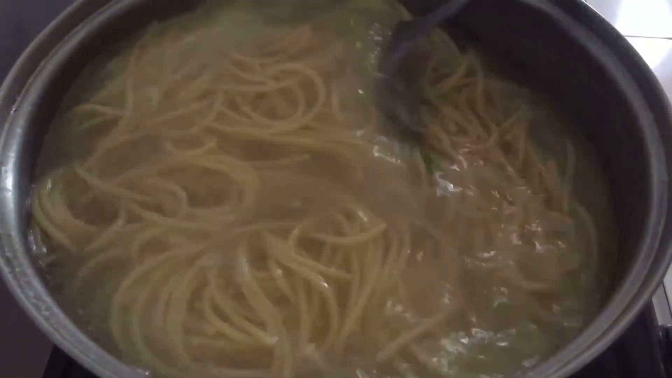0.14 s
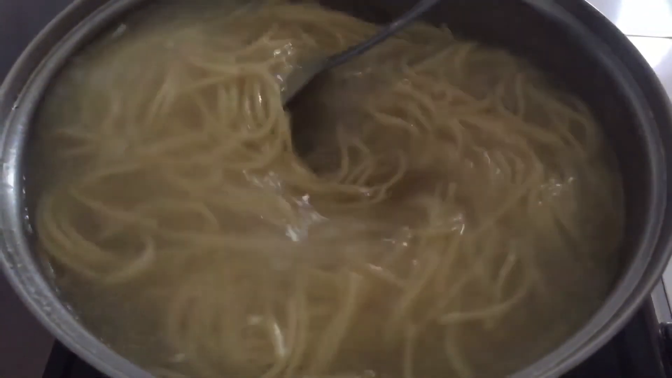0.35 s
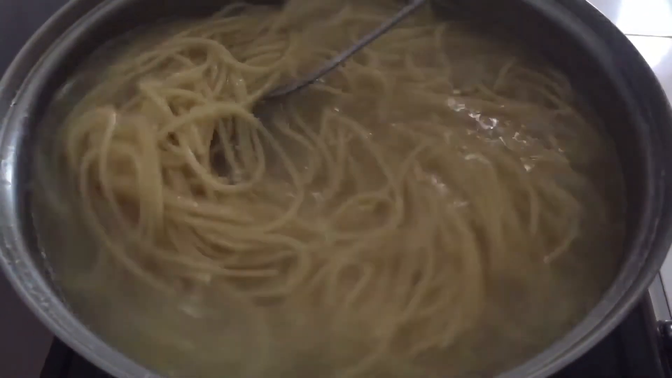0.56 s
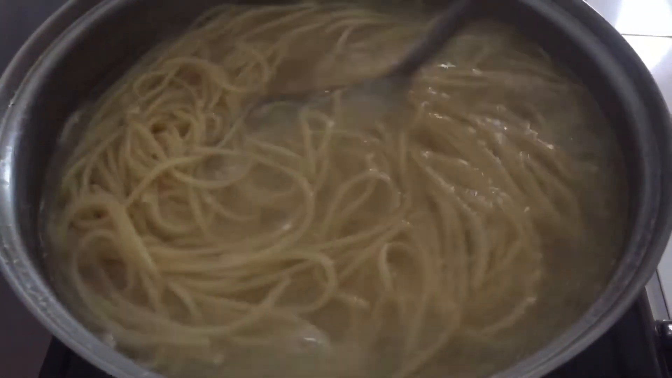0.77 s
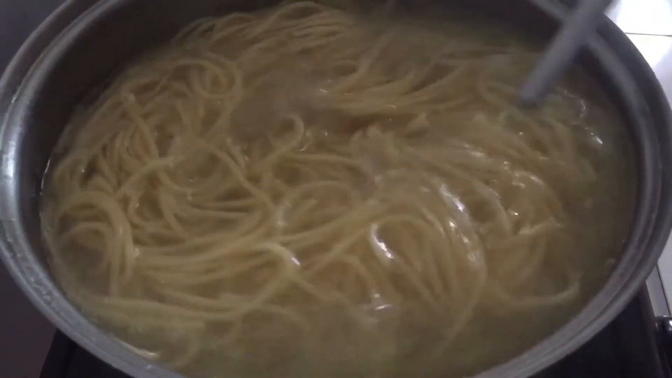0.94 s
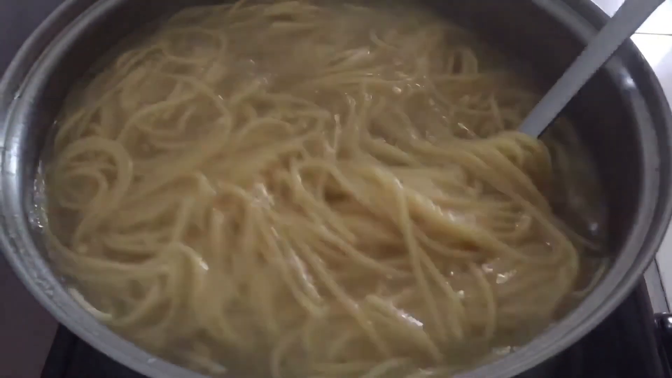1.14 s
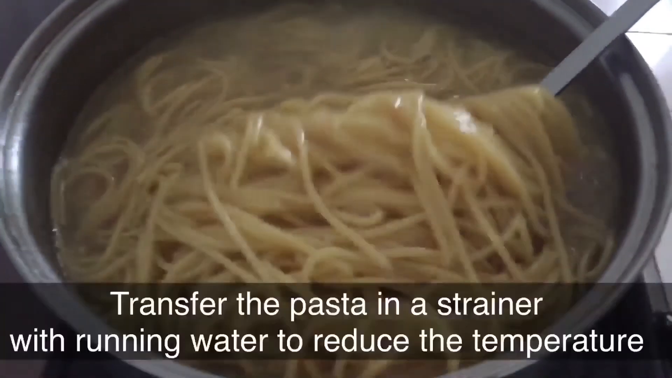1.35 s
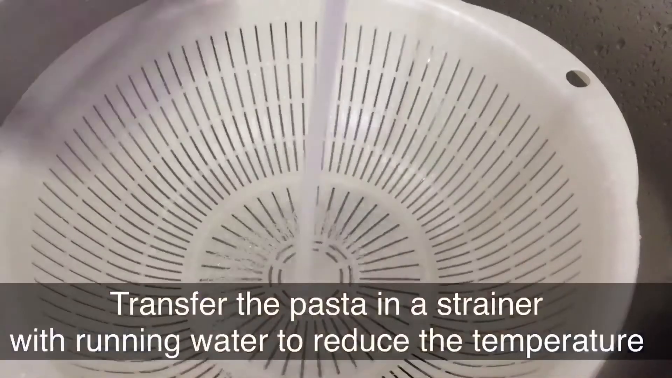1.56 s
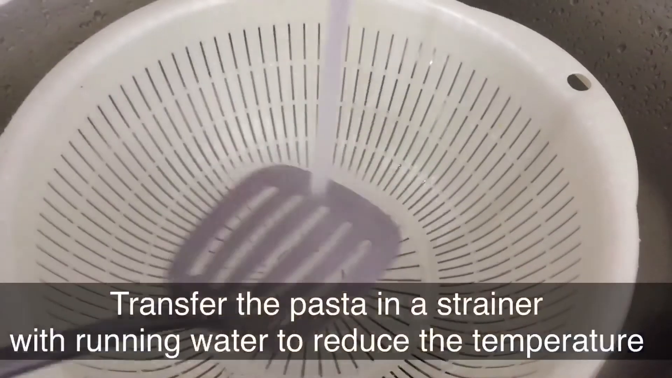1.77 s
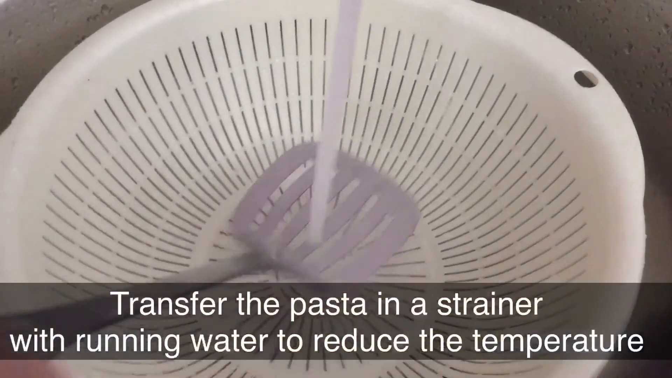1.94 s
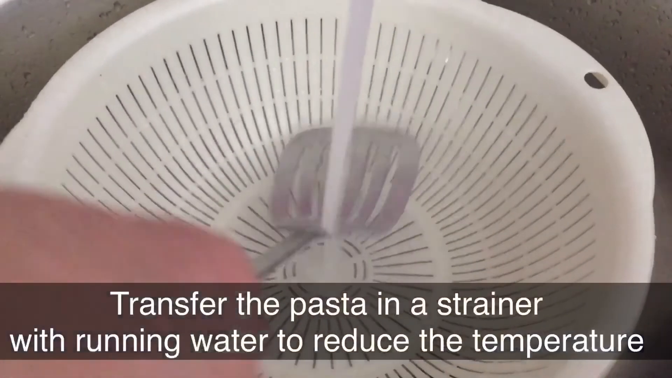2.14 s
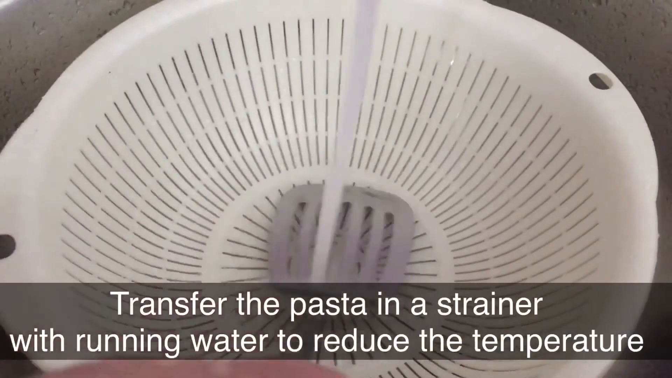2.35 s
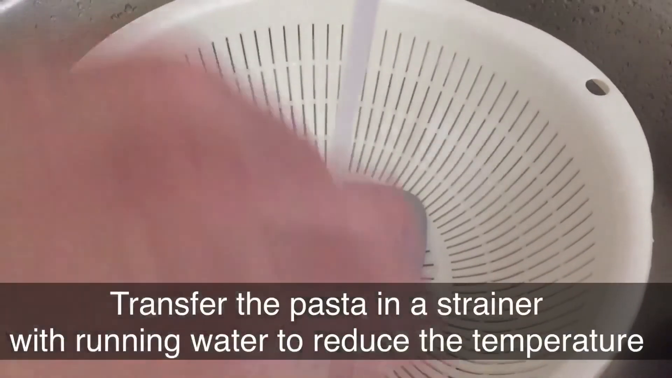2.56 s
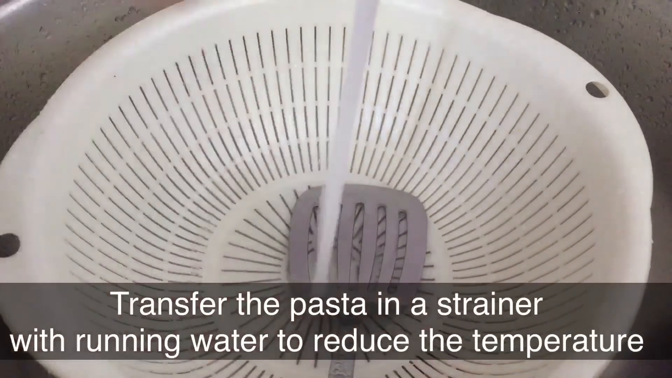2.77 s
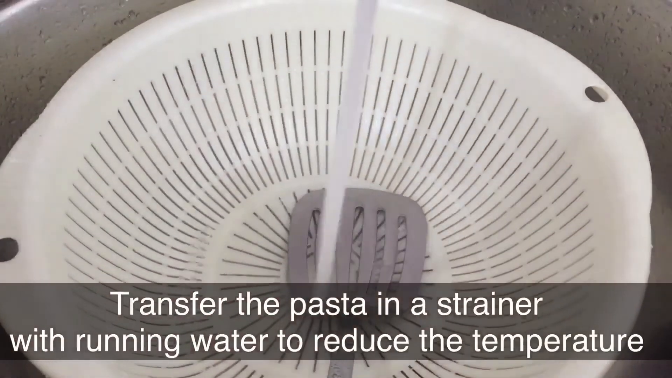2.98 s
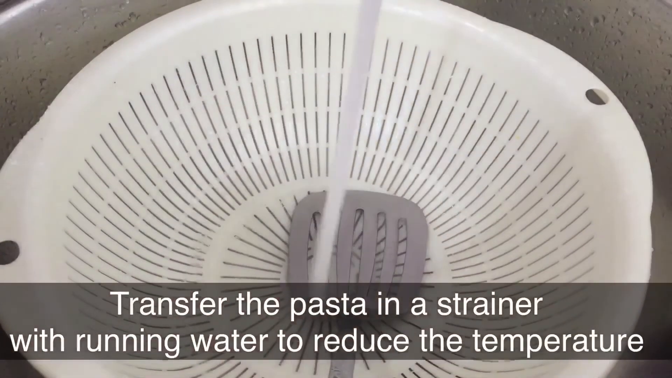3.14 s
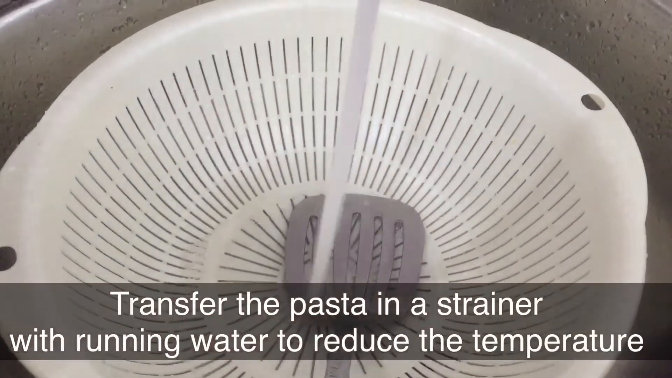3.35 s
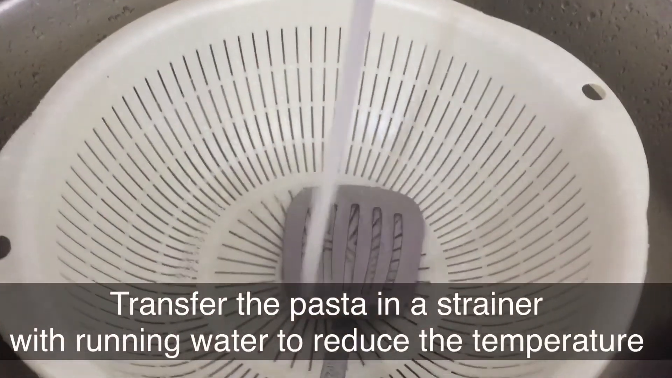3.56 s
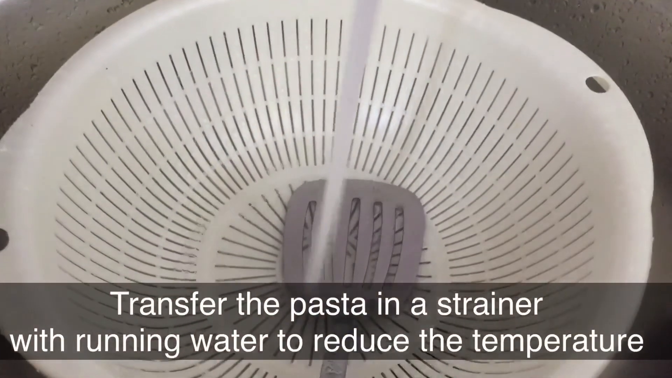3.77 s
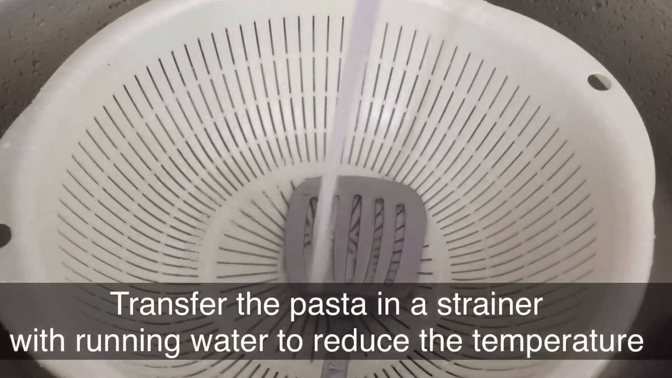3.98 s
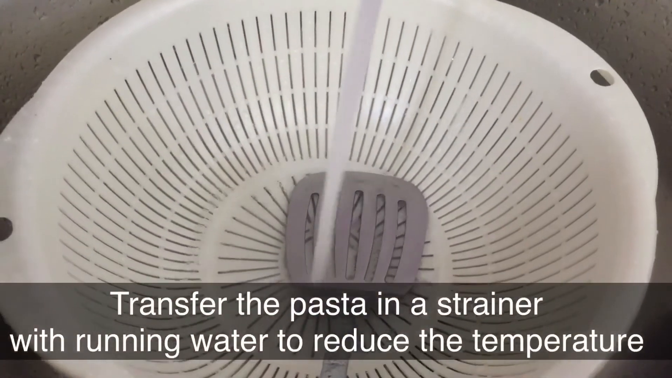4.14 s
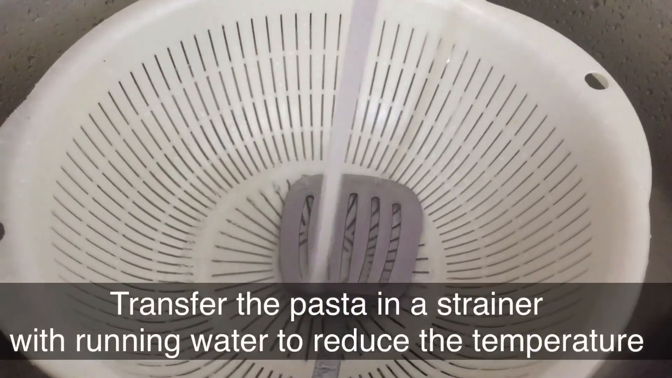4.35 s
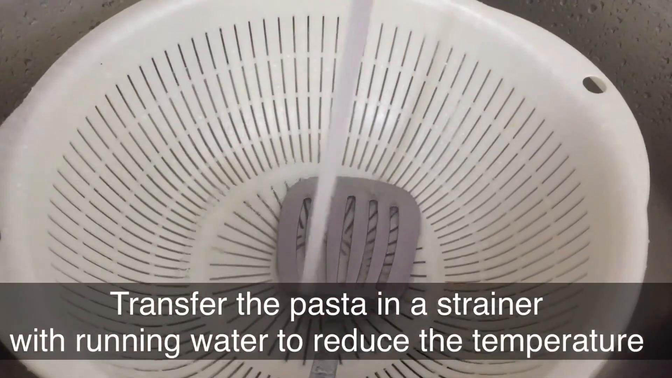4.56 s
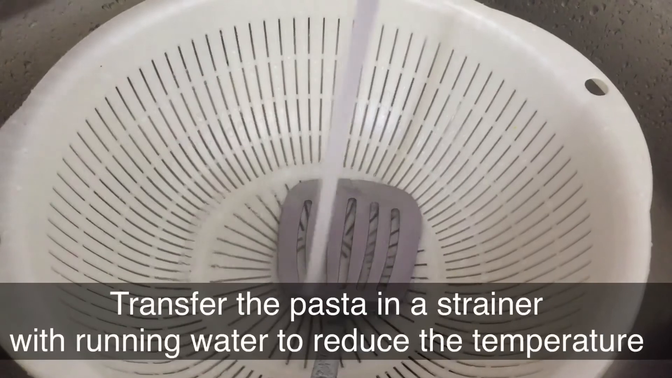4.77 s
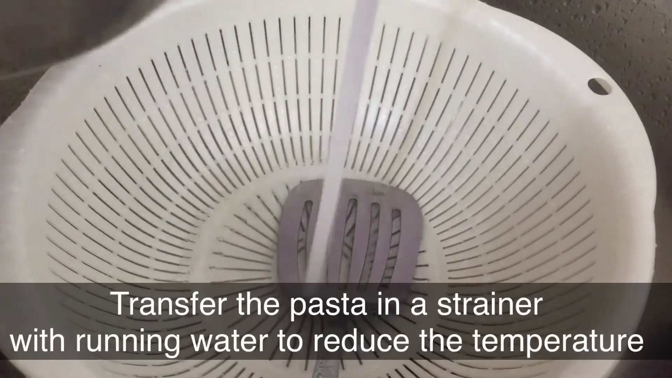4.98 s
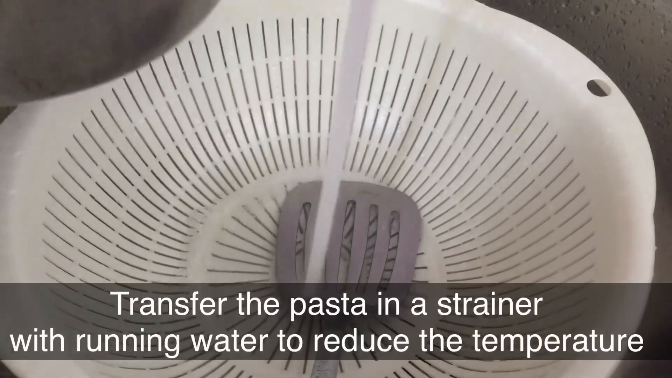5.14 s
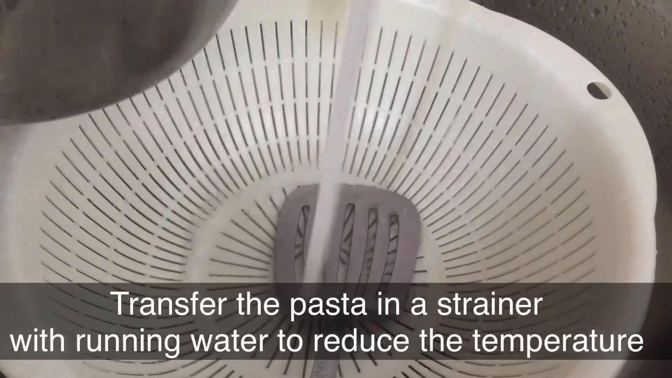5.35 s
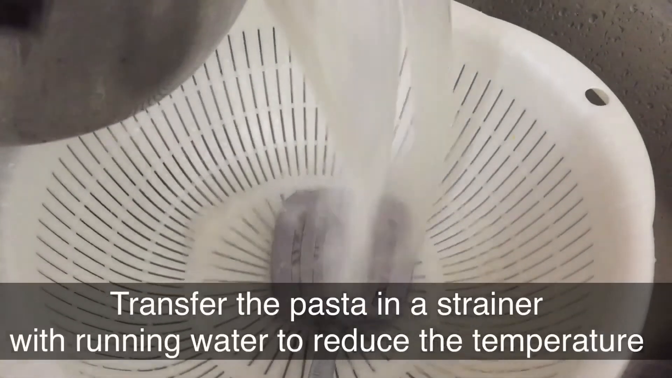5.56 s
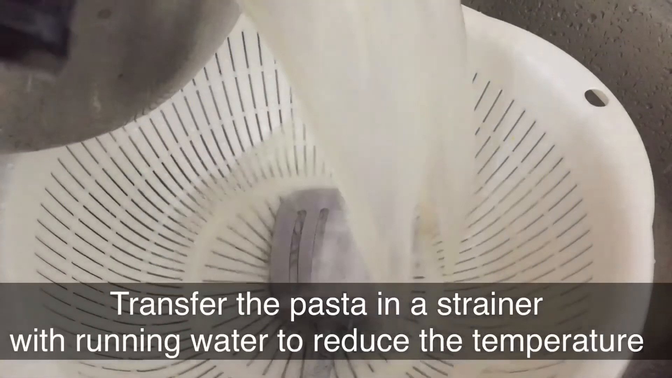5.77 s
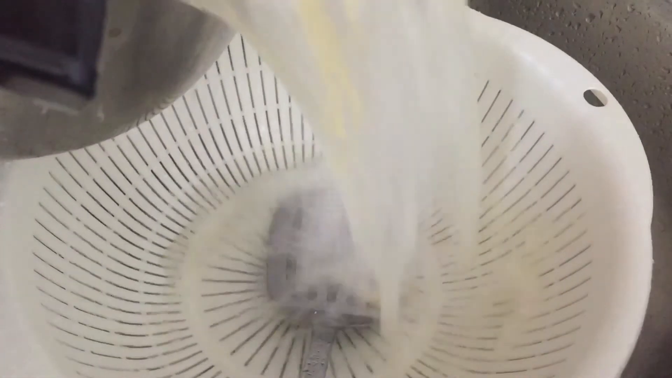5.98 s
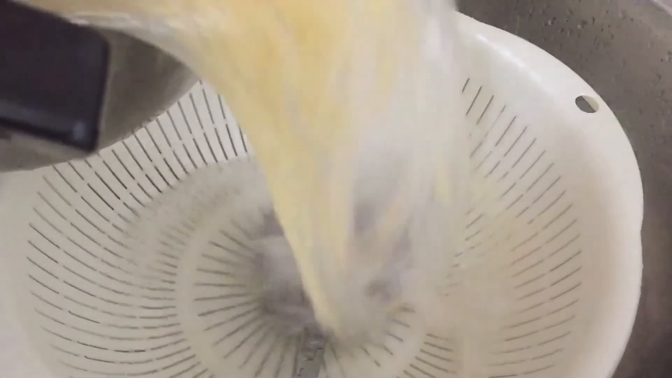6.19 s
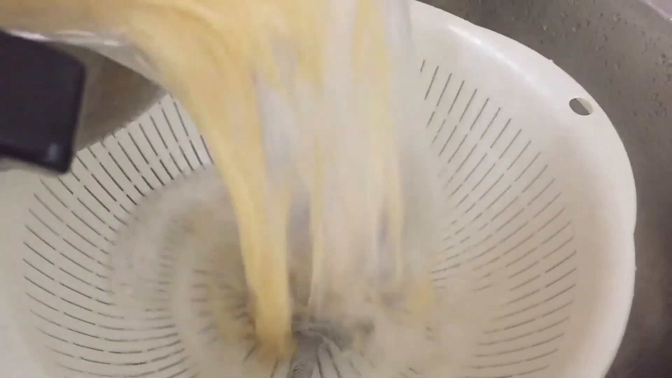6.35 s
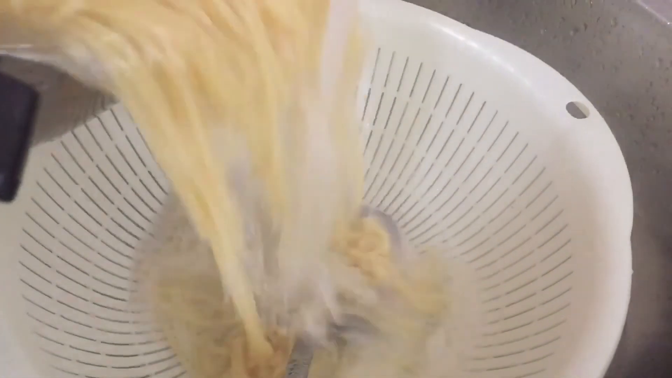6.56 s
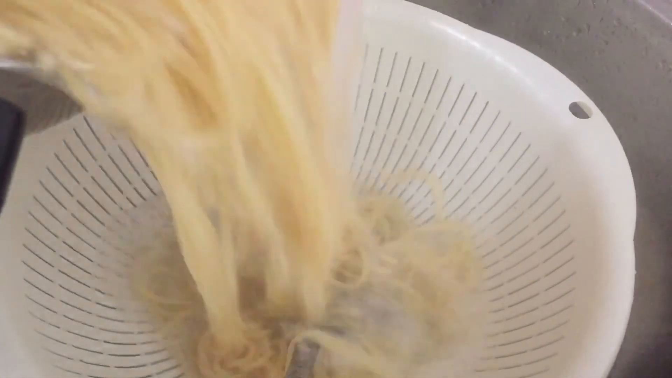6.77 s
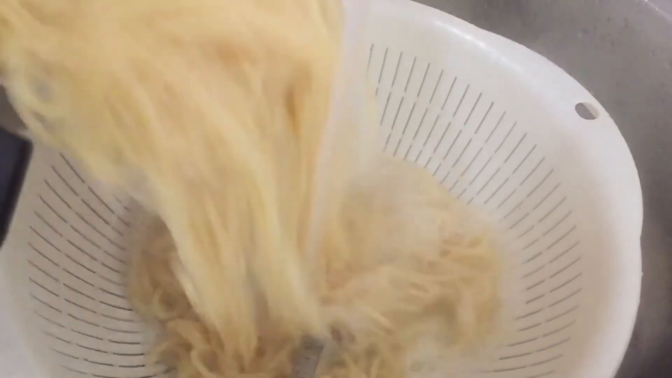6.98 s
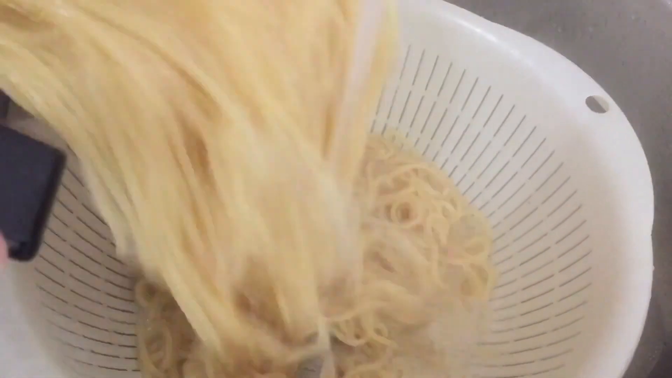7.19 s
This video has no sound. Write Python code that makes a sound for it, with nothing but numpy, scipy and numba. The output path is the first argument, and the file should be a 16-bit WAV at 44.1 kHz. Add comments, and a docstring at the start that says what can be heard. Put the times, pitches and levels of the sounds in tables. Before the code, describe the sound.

A low kitchen fan hums while wet spaghetti is stirred, with plops, clicks, a faint squeak and two spoon scrapes. It fades, and a bright, loud tap jet hisses onto a plastic colander in a steel sink. Two knocks follow, then steady water until a pot's heavy gush, bubbling and chirping, and noodles landing with wet smacks and a dull thud. Close microphone, small hard room.

```python
"""Water falls on a plastic colander in a steel sink: a tap's jet is drop impacts, noise bursts and bubble rings.
Before it, by a humming fan, spaghetti is stirred: crackle, plops, clicks, a squeak and scrapes of the spoon.
At the sink stray drops tick, a spatula goes under the jet, and knocks of the colander ring damped modes.
Then hot water gushes from the pot with chirping bubbles, and noodles follow with smacks and a modal thud."""
import sys
import numpy as np
from scipy import signal
from scipy.fft import rfft, irfft
from scipy.io import wavfile
from numba import njit

SR = 44100
rng = np.random.default_rng(int(sys.argv[2]) if len(sys.argv) > 2 else 0)


def dump(signal):
    """Clip the signal to [-1, 1] and save it as 16-bit WAV at the path in sys.argv[1]."""
    limited = np.clip(np.atleast_2d(signal).T, -1, 1)
    pcm = np.round(limited * 32767).astype(np.int16)
    wavfile.write(sys.argv[1], SR, pcm)


N = 318402
T = np.arange(N) / SR   # time in s
# every table named SPECTRUM lists: pitch_hz, relative density_db (per Hz)

# fan: air spectrum; hum: pitch_hz, rms level_db; whistling resonances: centre_hz, width_hz, height_db
FAN_SPECTRUM = [(30, -17), (60, -2), (90, 1), (125, 2), (200, 2), (280, -3.5), (420, -4.5), (560, -10),
                (1900, -31), (2300, -20), (3300, -25.5), (5000, -31.5), (7500, -46), (16000, -41)]
FAN_TONES = [(123.8, -56), (301.7, -47.5), (339.1, -62), (389, -54)]
FAN_WHISTLES = [(1550, 490, 15.5), (1945, 65, 16.5), (3730, 160, 4), (5980, 600, 19.5)]
FAN_AIR_DB = -47.5
# wet noodles crackling, and the pot simmering
CRACKLE_SPECTRUM = [(350, -15), (600, -3), (1400, 2), (3000, 0), (4500, -6), (6900, -10), (7900, -15),
                    (16000, -17)]
SIMMER_SPECTRUM = [(600, 5), (1600, -2.5), (2400, -7), (4000, -11.5)]
CRACKLE_DB, SIMMER_DB = -71.5, -60   # the pot between strokes
# strokes of the spoon that raise the crackle: start_s, level_db
STROKES = [(.232, -52), (0.364, -63), (.435, -58), (.98, -62)]
STROKE_ATTACK_S, STROKE_HOLD_S, STROKE_RELEASE_S = 0.011, 0.0082, 0.093
# plops, wet clicks and high ticks round the spoon: start_s, level_db, pitch_hz, cycles until 60 dB down
PLOPS = [(.236, -42, 8000, 20), (.249, -40, 2880, 24), (.308, -29, 1390, 32), (.309, -18.5, 2430, 14),
         (.309, -28.5, 4860, 18), (0.32, -29.5, 1130, 34), (.349, -31.5, 1760, 40), (.371, -23.5, 3660, 16),
         (.382, -32, 8950, 30), (.438, -38, 4900, 18), (.469, -33, 2180, 42), (0.480, -22.5, 3200, 30),
         (.585, -36, 2120, 46), (.985, -27.5, 880, 28), (.986, -28.5, 2880, 14), (1.057, -40, 13500, 10),
         (1.093, -31, 13000, 10), (1.108, -39, 9700, 30), (1.163, -39, 1950, 50)]
PLOP_ATTACK_CYCLES, PLOP_RISE = 1.8, 0.21   # the rise is a share of the pitch
# the spoon squeaks before it scrapes
SQUEAK_S, SQUEAK_EDGE_S, SQUEAK_HOLD_S, SQUEAK_DB = 0.595, 0.045, 0.04, -58
SQUEAK_HZ, SQUEAK_SAG_HZ_PER_S = 3350, 2200
# scrapes of the spoon along the pot: start_s, hold_s, level_db, ring_hz
SCRAPES = [(0.701, 0.058, -43, 6850), (0.803, 0.067, -41, 4730)]
SCRAPE_SPECTRUM = [(400, -14), (700, 2), (1500, 0), (3000, -6), (4500, -7), (7000, -6), (9000, -14.5),
                   (16000, -13)]
# resonances of the pot: centre_hz, width_hz, height_db
POT_RINGS = [(1430, 200, 3), (2200, 360, 2), (3720, 270, 6), (5900, 400, 2), (8500, 250, 9), (9600, 250, 9),
             (12500, 300, 8)]
SCRAPE_ATTACK_S, SCRAPE_RELEASE_S, SCRAPE_RING_WIDTH_HZ, SCRAPE_RING_DB = 0.024, 0.045, 330, 9
FLUTTER_DB, FLUTTER_HZ = 1.5, 29   # the spoon catches and slips: rms depth, corner of the drift
STOVE_END_S, STOVE_FADE_S = 1.317, 0.14   # the stove fades out
SINK_START_S, SINK_FADE_S = 1.489, 0.0091   # the sink cuts in

# the steady jet: fine spray, slapping on plastic, drumming of the sink
SPRAY_SPECTRUM = [(600, -37), (900, -48), (1500, -15.5), (1950, -8.5), (2760, -8), (3680, -3), (5300, -0.5),
                  (6500, -3), (7770, -1.5), (9420, -0.5), (12600, -1.5), (16000, -4)]
SLAP_SPECTRUM = [(300, -28), (450, -10), (540, 0), (660, -3), (850, -5.5), (1000, -6.5), (1250, -2),
                 (1700, -3.5), (2600, -1.5), (5000, -17)]
DRUM_SPECTRUM = [(28, -51), (45, -10), (65, 1), (90, -8.5), (112, 3), (135, -14), (160, -13), (190, -1.5),
                 (225, -12), (260, -7.5), (380, -13), (450, -25), (700, -18), (1200, -70.5)]
SPRAY_DB, SLAP_DB, DRUM_DB = -24, -47, -41
# resonances and hollows of the basin: centre_hz, width_hz, height_db
BASIN = [(1770, 540, 5.5), (2420, 200, 5), (3096, 270, 4.5), (3690, 87, 5), (3890, 205, -4.5),
         (4300, 240, 2), (4840, 370, -1.5), (5340, 180, 5.5), (5870, 150, 3), (6260, 180, 6), (6720, 95, 7),
         (7890, 280, -3), (9500, 700, 1), (10370, 570, -4.5)]
TAP_SWELL_S, TAP_SWELL_DB = 0.11, 18   # the jet swells by this much to its steady flow
# until the spatula slides under it, the jet slaps the bare colander harder
SPATULA_IN_S, SPATULA_SLIDE_S, BARE_SLAP_DB = 1.88, 0.036, 6
# until it has settled, the colander is louder
SETTLED_S, SETTLING_S, LOOSE_SLAP_DB, LOOSE_DRUM_DB = 2.74, 0.36, 5, 4
# the stream's splashing dips briefly while the spatula shifts and after the thud: start_s, hold_s, depth_db
DIPS = [(1.908, 0.018, 5), (2.152, 0.094, 3.5), (2.336, 0.013, 3.5), (2.648, 0.17, 4), (6.46, 0.04, 0.5)]
DIP_EDGE_S = 0.026
# water pools in the colander and deepens the sound
POOL_S, POOL_FILL_S, POOL_SLAP_DB, POOL_DRUM_DB = 5.43, 0.49, 8, 5
# brief changes as water and noodles land: start_s, slap change_db, drum change_db
LANDINGS = [(5.391, 5.5, 4), (6.08, 4, -1.5), (6.41, 5, 1), (6.925, 3.5, -4), (7.125, -2, -0.5)]
LANDING_ATTACK_S, LANDING_HOLD_S, LANDING_RELEASE_S = 0.015, 0.045, 0.077
# stray drops ticking loudest on the plastic: start_s, level_db
TICKS = [(1.698, 2), (1.9935, 2), (2.087, -7), (2.2987, -7), (2.474, -5)]
TICK_SPECTRUM = [(1000, -17), (4000, -1), (13000, 7)]
TICKS_PER_S, TICK_DB, TICK_SPREAD_DB = 49, -15, 3.5   # the rest fall at random
# single fat splashes: start_s, level_db, pocket_db (trapped air against spray), pitch_hz
SPLASHES = [(1.522, -19, -22, 5350), (1.729, -10.5, 3.5, 4420), (1.872, -2.5, -6, 4240),
            (1.992, -2.5, -5, 4200), (2.296, -4, -5, 5100), (3.043, -9.5, -6, 1900), (3.244, -7, -9, 6600),
            (4.1771, -5.5, -9, 3350), (4.243, -15, -2, 5140), (4.419, -15, -0.5, 1950),
            (4.622, -11, 3, 5260), (4.812, -5, -4, 4400), (5.334, -7.5, -8, 5470), (5.615, -2.5, -8, 3020),
            (5.673, -2, -1, 6330), (5.729, -4, -6, 3520), (5.7915, -0.5, -4.5, 6860), (5.833, 0, -15, 5000),
            (5.943, 0.5, -3, 3200), (5.972, -7.5, 0.5, 3100), (6.029, -1, -1, 6570), (6.123, 2, -6, 3400),
            (6.205, -3, 0.5, 2640), (6.425, -6, -5, 3060), (6.835, -2.5, -3, 6370)]
SPLASH_T60_S = 0.044
SPLASH_CRACK_DB, SPLASH_CRACK_T60_S = -17, 0.0053   # first impact, against the spray that follows

# knocks of the colander on the sink:
# start_s, ring_db, crack_db, crack_t60_s, low_corner_hz, high_corner_hz
KNOCKS = [(2.4032, -36, -7, 0.038, 1250, 14900), (2.409, -11, -18, 0.091, 25, 149),
          (2.6389, -2, 0, 0.077, 20, 7500), (2.646, -20, -7.5, 0.15, 60, 2600),
          (2.662, -34, -10.5, 0.069, 250, 6000), (2.678, -32, -11, .1, 180, 5000)]
CRACK_SPECTRUM = [(80, -13), (180, 7), (260, -1), (370, -3), (850, -11.5), (1620, -0.5), (2400, -9),
                  (3200, -4.5), (3700, -5.5), (4200, -8.5), (7000, -8.5), (10000, -13.5), (16000, -12.5)]
# modes of colander and sink: pitch_hz, level_db, t60_s
SINK_MODES = [(56.4, -13.5, 0.35), (74, -14, 0.18), (108, -13, 0.47), (153.7, -27, 0.67),
              (176.8, -20, 0.79), (195.5, -14, 0.39), (252, -17.5, 0.44), (367, -6, 0.24),
              (420, -16.5, 0.31), (627, -13, 0.24), (717, -15.5, 0.23), (944, -24, 0.17), (1283, -24, 0.2),
              (1400, -14, 0.21), (1445, -15, 0.083), (1586, -7.5, 0.14), (1694, -10.5, 0.3),
              (1880, -24, 0.18), (3040, -19, 0.13), (3170, -1, 0.17), (3325, -6, 0.13), (3840, -27, .18),
              (4030, -19, 0.18), (4500, -23, 0.087)]
ROCK_SHARE, ROCK_HZ = 0.023, 92   # rocking wavers each pitch: rms share, corner of the drift
CLATTER_DB, CLATTER_HZ = 3, 140   # rattle as a knock dies away: rms depth, corner of the drift

# the gush from the pot: its body and its bright splashing
GUSH_SPECTRUM = [(700, -28), (1300, -13.5), (2400, -1), (3200, 0), (4200, -3.5), (5500, -2), (9000, -9),
                 (15000, -54)]
GUSH_BRIGHT_SPECTRUM = [(2000, -28), (3300, 4), (4300, 5), (5400, 5.5), (7000, 8.5), (9200, 5.5),
                        (12000, -45), (16000, -12)]
POUR_S, POUR_ATTACK_S = 5.595, 0.023
GUSH_DB, GUSH_BRIGHT_DB, GURGLE_DB = -32.5, -28.5, -43.5   # gurgle: larger bubbles churned up
SURGE_DB, SURGE_HZ = 2.5, 15   # the gush comes unevenly: rms depth, corner of the drift
# the noodles follow the water and change each layer by this much
NOODLES_S, NOODLES_SLIDE_S = 6.2, 0.09
NOODLE_BODY_DB, NOODLE_BRIGHT_DB = 2, -5.5
NOODLE_SPRAY_DB, NOODLE_SLAP_DB, NOODLE_DRUM_DB = -3, 2, -1
# large bubbles bursting with an upward chirp: start_s, level_db, pitch_hz
POPS = [(5.8588, 4.5, 3920), (5.87, -8, 3120), (6.205, -18, 2200), (6.282, -13, 3180), (6.321, -9, 3100),
        (6.781, -10, 2430), (6.827, -14, 3220), (7.131, -14.5, 1206), (7.146, -7, 3580), (7.148, -12, 1340),
        (7.162, -11, 3100)]
POP_CYCLES, POP_RISE = 32, 0.4   # cycles until 60 dB down; rise as a share of the pitch
# hanks of noodles smacking into the pool: start_s, level_db
SMACKS = [(6.205, -16.5), (6.918, -25), (6.93, -17), (6.958, -19.5), (7.178, -21)]
SMACK_SPECTRUM = [(400, -12.5), (1300, -1), (3300, -2), (6000, -16), (12000, -26)]
SMACK_T60_S = 0.036
# modes of the heavy, wet landing: pitch_hz, level_db, t60_s
THUD_MODES = [(76.5, -24, 0.4), (108.3, -23, 0.33), (191.3, -13.5, 0.27), (270, -9.5, 0.084),
              (378, -16.5, 0.13), (602, -17.5, 0.18), (619, 2, 0.047), (672, 0.5, 0.034),
              (731, -16.5, 0.13), (896, -18, 0.13), (1090, -15, 0.058)]
RUMBLE_SPECTRUM = [(60, -8), (190, 2), (480, -12), (680, -7), (1000, -24)]
THUD_S, RUMBLE_DB, RUMBLE_T60_S = 6.4522, -19, 0.3   # the sink rumbles after the blow
MIC_LOW_CUT_HZ, CUTOFF_HZ = 36, 15850


def from_db(db):
    """Logarithmic level: 20 dB is a factor of ten in amplitude."""
    return 10 ** (np.asarray(db) / 20)


def rms_one(x):
    """Normalisation by mean power: scale to rms 1."""
    return x / np.sqrt(np.mean(x ** 2) + 1e-20)


def drift(corner_hz):
    """Random fluctuation: white noise through two equal low-pass poles, rms 1."""
    step = 40   # samples between slow values
    r = np.exp(-2 * np.pi * corner_hz * step / SR)
    noise = rng.standard_normal(N // step + 2002)
    slow = signal.lfilter([1], [1, -2 * r, r * r], noise)[2000:]   # skip the filter's start-up
    return np.interp(np.arange(N) / step, np.arange(len(slow)), rms_one(slow))


def ring(clicks, hz, t60):
    """Damped oscillator: a unit click starts a decaying sine of height 1."""
    r, w = from_db(-60 / (t60 * SR)), 2 * np.pi * hz / SR
    return signal.lfilter([0, np.sin(w)], [1, -2 * r * np.cos(w), r * r], clicks + 1e-18)


def dying(t60, size=22050):
    """Exponential decay: 60 dB are lost in t60 seconds."""
    return np.exp(-np.log(1000) * T[:size] / t60)


def ramp(start_s, length_s):
    """Linear transition: rises evenly from 0 to 1, then stays."""
    return np.clip((T - start_s) / length_s, 0, 1)


def envelope(s, attack_s, hold_s, release_s):
    """Piecewise-linear envelope: attack, hold, release."""
    return np.interp(T, s + np.cumsum([0, attack_s, hold_s, release_s]), [0, 1, 1, 0])


def add(out, s, sound):
    """Superposition: mix a sound in at time s."""
    at = round(s * SR)
    out[at:at + len(sound)] += sound[:N - at]


def colour(x, spectrum, peaks=(), size=8192):
    """Minimum-phase filtering: a causal response of unit power from a spectrum and resonances."""
    hz = np.maximum(np.arange(size // 2 + 1) * SR / size, 1)
    points_hz, points_db = np.transpose(spectrum)
    db = np.interp(np.log(hz), np.log(points_hz), points_db)
    db = db + sum(height * np.exp(-2 * ((hz - centre) / width) ** 2) for centre, width, height in peaks)
    # folding the cepstrum onto positive times makes the phase minimal
    cepstrum = irfft(np.log(from_db(db)))
    cepstrum[1:size // 2] *= 2
    cepstrum[size // 2 + 1:] = 0
    response = irfft(np.exp(rfft(cepstrum)))
    return signal.oaconvolve(x, response / np.linalg.norm(response))[:len(x)]


def impacts(per_s, spread_db):
    """Random arrivals: clicks of either sign, their sizes exponentially distributed in dB."""
    sizes = from_db(spread_db * np.minimum(rng.exponential(1, N), 4.5))
    return sizes * rng.choice([-1, 1], N) * (rng.random(N) < per_s / SR)


def bubble(hz, decay, rise):
    """Bubble resonance: trapped air rings and rises in pitch as it nears the surface."""
    glide = hz * (1 + rise * (.5 - decay))
    return decay * np.sin(2 * np.pi * np.cumsum(glide) / SR)


def plop(hz, cycles, rise):
    """Onset of a resonance: one ring swells within a cycle or two and dies away."""
    decay = dying(cycles / hz, size=4096)
    swell = np.minimum(T[:len(decay)] * hz / PLOP_ATTACK_CYCLES, 1)
    return swell * bubble(hz, decay, rise)


@njit
def ringing(starts, sizes, pitches, cycles, rise, fall, size):
    """Rotating phasors: each bubble rings at its own pitch, gliding by rise as it dies away."""
    out = np.zeros(N + size)
    for k in range(len(starts)):
        length = int(cycles * SR / pitches[k])
        loss, decay, wave = np.exp(-fall / length), 1., sizes[k] + 0j
        for block in range(starts[k], min(starts[k] + length, N), size):   # pitch held within a block
            turn = loss * np.exp(2j * np.pi * pitches[k] * (1 + rise * (.5 - decay)) / SR)
            for i in range(block, block + size):
                out[i] += wave.imag
                wave *= turn
                decay *= loss
    return out


def bubbles(drops, cycles, low_hz, high_hz, rise):
    """Bubble resonance in number: every drop rings at a random pitch; rms 1."""
    starts = np.flatnonzero(drops)
    pitches = low_hz * (min(high_hz, CUTOFF_HZ) / low_hz) ** rng.random(N)[starts]
    sizes = drops[starts] * pitches
    rings = ringing(starts, sizes, pitches, float(cycles), float(rise), np.log(1000), size=32)
    return rms_one(rings[:N])


def water(per_s, spread_db, burst_s, tick_db, bubble_db, cycles, low_hz, high_hz):
    """Drop impact: each ticks, throws a dying burst of droplets and traps a ringing bubble; rms 1."""
    drops = impacts(per_s, spread_db)
    energy = signal.lfilter([1], [1, -np.exp(-2 / (burst_s * SR))], drops ** 2 + 1e-18)
    bursts = np.sqrt(energy) * rng.standard_normal(N)
    rings = bubbles(drops, cycles, low_hz, high_hz, rise=0.036)
    return rms_one(rms_one(bursts) + from_db(tick_db) * rms_one(drops) + from_db(bubble_db) * rings)


def reflections(x, wet_db, t60):
    """Diffuse reflection: dense random echoes, kept above about 700 Hz, die away exponentially."""
    tail = dying(t60)
    tail = tail * (T[:len(tail)] > .001)   # the first echo comes after 1 ms
    high_pass = signal.butter(2, 700, "high", fs=SR, output="sos")
    tail = signal.sosfilt(high_pass, tail * rng.standard_normal(len(tail)))
    return x + from_db(wet_db) * signal.oaconvolve(x, tail / np.linalg.norm(tail))[:N]


def fan():
    """Broadband flow noise with a tonal hum that wavers slightly in level and phase."""
    air = colour(rng.standard_normal(N), FAN_SPECTRUM, FAN_WHISTLES)
    out = from_db(FAN_AIR_DB) * from_db(0.47 * drift(4.3)) * air
    for hz, db in FAN_TONES:
        tone = np.sqrt(2) * np.sin(2 * np.pi * hz * T + 0.21 * drift(2.1))
        out += from_db(db + 1.6 * drift(4)) * tone
    return out


def stirring():
    """Damped resonances: sticky crackle over a soft simmer, rising plops, clicks and ticks, and the spoon."""
    crackle = water(per_s=310, spread_db=8.0, burst_s=0.0025, tick_db=-3, bubble_db=-1.5,
                    cycles=20, low_hz=1210, high_hz=9000)
    simmer = water(per_s=560, spread_db=1.5, burst_s=0.002, tick_db=-2, bubble_db=-1,
                   cycles=73, low_hz=670, high_hz=2700)
    strokes = sum(from_db(db) * envelope(s, STROKE_ATTACK_S, STROKE_HOLD_S, STROKE_RELEASE_S)
                  for s, db in STROKES)
    out = (from_db(CRACKLE_DB) + strokes) * colour(crackle, CRACKLE_SPECTRUM)
    out += from_db(SIMMER_DB) * colour(simmer, SIMMER_SPECTRUM)
    for s, db, hz, cycles in PLOPS:
        add(out, s, from_db(db) * plop(hz, cycles, PLOP_RISE))
    return reflections(out + spoon(), wet_db=-9, t60=0.13)


def spoon():
    """Stick-slip friction: a sagging squeak, then uneven scrapes that each bring out a ring of the pot."""
    pitch = SQUEAK_HZ - SQUEAK_SAG_HZ_PER_S * (T - SQUEAK_S) + 70 * drift(150)
    squeak = np.sin(2 * np.pi * np.cumsum(pitch) / SR)
    out = from_db(SQUEAK_DB) * envelope(SQUEAK_S, SQUEAK_EDGE_S, SQUEAK_HOLD_S, SQUEAK_EDGE_S) * squeak
    grains = rms_one(impacts(per_s=8200, spread_db=2.0))
    rings = bubbles(impacts(per_s=1200, spread_db=1.0), cycles=190, low_hz=1396, high_hz=13100, rise=0)
    slips = rms_one(grains + from_db(-2) * rings) * from_db(FLUTTER_DB * drift(FLUTTER_HZ))
    for s, hold_s, db, hz in SCRAPES:
        stroke = from_db(db) * envelope(s, SCRAPE_ATTACK_S, hold_s, SCRAPE_RELEASE_S)
        resonances = POT_RINGS + [(hz, SCRAPE_RING_WIDTH_HZ, SCRAPE_RING_DB)]
        out += stroke * colour(slips, SCRAPE_SPECTRUM, resonances)
    return out


def dip_depth_db():
    """Amplitude modulation: dB by which the stream's splashing briefly dips."""
    return sum(db * envelope(s, DIP_EDGE_S, hold_s, DIP_EDGE_S) for s, hold_s, db in DIPS)


def tap(noodles):
    """Jet impact: bright spray, slaps on plastic and drumming steel; what it lands on sets the mix."""
    flow = from_db(TAP_SWELL_DB * (ramp(SINK_START_S, TAP_SWELL_S) - 1))
    bare = 1 - ramp(SPATULA_IN_S, SPATULA_SLIDE_S)
    loose = 1 - ramp(SETTLED_S, SETTLING_S)
    pool = ramp(POOL_S, POOL_FILL_S)
    dip_db = dip_depth_db()
    landing_slap_db, landing_drum_db = sum(
        np.outer(dbs, envelope(s, LANDING_ATTACK_S, LANDING_HOLD_S, LANDING_RELEASE_S))
        for s, *dbs in LANDINGS)

    spray = water(per_s=1400, spread_db=3.0, burst_s=0.0078, tick_db=-11, bubble_db=-6.0,
                  cycles=25, low_hz=2490, high_hz=14150)
    spray_db = SPRAY_DB - dip_db + NOODLE_SPRAY_DB * noodles + 0.62 * drift(32)
    spray = from_db(spray_db) * colour(spray, SPRAY_SPECTRUM, BASIN)

    slap = water(per_s=900, spread_db=2.0, burst_s=0.048, tick_db=-11.5, bubble_db=-6.0,
                 cycles=33.0, low_hz=602, high_hz=2228)
    slap_db = SLAP_DB + BARE_SLAP_DB * bare + LOOSE_SLAP_DB * loose + POOL_SLAP_DB * pool
    slap_db = slap_db + NOODLE_SLAP_DB * noodles - dip_db + landing_slap_db
    slap = from_db(slap_db) * colour(slap, SLAP_SPECTRUM)

    drum = colour(rms_one(impacts(per_s=700, spread_db=2.0)), DRUM_SPECTRUM)
    drum_db = DRUM_DB + LOOSE_DRUM_DB * loose + POOL_DRUM_DB * pool
    drum_db = drum_db + NOODLE_DRUM_DB * noodles + landing_drum_db
    return flow * (spray + slap + from_db(drum_db) * drum)


def ticks():
    """Impulsive excitation: stray drops strike the plastic with a sharp, dry tick."""
    drops = from_db(TICK_DB) * impacts(TICKS_PER_S, TICK_SPREAD_DB) * ramp(SINK_START_S, TAP_SWELL_S)
    for s, db in TICKS:
        add(drops, s, from_db([db]))
    return colour(drops, TICK_SPECTRUM)


def splashes():
    """Air entrainment: a fat drop cracks, bursts into spray and rings the air pocket it traps."""
    out = np.zeros(N)
    decay = dying(SPLASH_T60_S, size=8192)
    crack = from_db(SPLASH_CRACK_DB) * dying(SPLASH_CRACK_T60_S, size=8192)
    for s, db, pocket_db, hz in SPLASHES:
        burst = (crack + decay) * rng.standard_normal(len(decay))
        gurgle = ring(burst * decay, hz, t60=0.0096)
        pocket = 0.49 * gurgle / np.abs(gurgle).max()
        spray = 0.25 * colour(burst, SPRAY_SPECTRUM, BASIN)
        add(out, s, from_db(db) * (spray + from_db(pocket_db) * pocket))
    return out


def knocks():
    """Modal vibration: contacts crack and ring wavering modes; soft ones lose treble, light ones bass."""
    out = np.zeros(N)
    size = SR // 2
    body = 0
    for k, (hz, db, t60) in enumerate(SINK_MODES):
        pitch = hz * (1 + ROCK_SHARE * drift(ROCK_HZ)[:size])
        mode = dying(t60, size) * np.sin(2 * np.pi * np.cumsum(pitch) / SR)
        body = body + (-1) ** k * from_db(db) * mode   # neighbouring modes start in opposite sense
    for s, ring_db, crack_db, crack_t60, low_hz, high_hz in KNOCKS:
        rattle = from_db(CLATTER_DB * drift(CLATTER_HZ)[:size])
        crack = colour(dying(crack_t60, size) * rattle * rng.standard_normal(size), CRACK_SPECTRUM)
        soft = signal.butter(1, min(high_hz, CUTOFF_HZ), fs=SR, output="sos")
        light = signal.butter(1, low_hz, "high", fs=SR, output="sos")
        contact = from_db(ring_db) * body + from_db(crack_db) * crack
        add(out, s, signal.sosfilt(np.vstack([soft, light]), contact))
    return reflections(out, wet_db=-14.0, t60=0.58)


def gush(noodles):
    """Unsteady flow: the thick stream lands in surges; its bright splashing fades as noodles follow."""
    flow = ramp(POUR_S, POUR_ATTACK_S) * from_db(SURGE_DB * drift(SURGE_HZ) - dip_depth_db())
    body = water(per_s=1400, spread_db=3.5, burst_s=0.0078, tick_db=-2.5, bubble_db=-2,
                 cycles=40, low_hz=1307, high_hz=4440)
    bright = water(per_s=540, spread_db=5.0, burst_s=0.0038, tick_db=-7, bubble_db=-9.5,
                   cycles=63, low_hz=2930, high_hz=10300)
    body = from_db(GUSH_DB + NOODLE_BODY_DB * noodles) * colour(body, GUSH_SPECTRUM)
    bright_db = GUSH_BRIGHT_DB + NOODLE_BRIGHT_DB * noodles
    bright = from_db(bright_db) * colour(bright, GUSH_BRIGHT_SPECTRUM)
    churned = impacts(per_s=100, spread_db=-1.5)
    gurgle = from_db(GURGLE_DB) * bubbles(churned, cycles=28, low_hz=1240, high_hz=3540, rise=0.52)
    return flow * (body + bright + gurgle)


def pops():
    """Shrinking resonator: a bursting bubble's brief ring sweeps upward."""
    out = np.zeros(N)
    for s, db, hz in POPS:
        add(out, s, from_db(db) * plop(hz, POP_CYCLES, POP_RISE))
    return out


def smacks():
    """Granular impact: a hank of noodles hits the pool in a short, ragged burst of wet grains."""
    hits = np.zeros(N)
    for s, db in SMACKS:
        add(hits, s, from_db(db) * dying(SMACK_T60_S))
    return colour(hits * rms_one(impacts(per_s=5000, spread_db=-1.0)), SMACK_SPECTRUM)


def thud():
    """Modal response to a dull blow on the water-laden colander; the sink rumbles on as noodles settle."""
    blow, settling = np.zeros(N), np.zeros(N)
    add(blow, THUD_S, np.ones(1))
    add(settling, THUD_S, dying(RUMBLE_T60_S))
    body = sum((-1) ** k * from_db(db) * ring(blow, hz, t60) for k, (hz, db, t60) in enumerate(THUD_MODES))
    rumble = from_db(RUMBLE_DB) * colour(settling * rng.standard_normal(N), RUMBLE_SPECTRUM)
    soft = signal.butter(4, 1150, fs=SR, output="sos")
    return reflections(signal.sosfilt(soft, body + rumble), wet_db=-15, t60=0.09)


def scene():
    """Superposition of sources: first the stove, then the sink."""
    stove = fan() + stirring()
    noodles = ramp(NOODLES_S, NOODLES_SLIDE_S)
    wet = tap(noodles) + ticks() + splashes() + gush(noodles) + pops() + smacks()
    sink = reflections(wet, wet_db=-8.5, t60=0.072) + knocks() + thud()
    stove_gain = 1 - ramp(STOVE_END_S, STOVE_FADE_S)
    sink_gain = ramp(SINK_START_S, SINK_FADE_S)
    return (stove_gain * stove + sink_gain * sink)[None]


def record(dry):
    """Band limiting and overload: the deepest bass is lost, peaks beyond 1 clip, and the top is cut."""
    low_cut = signal.butter(4, MIC_LOW_CUT_HZ, "high", fs=SR, output="sos")
    clipped = np.clip(signal.sosfilt(low_cut, dry), -1, 1)
    top_cut = signal.ellip(12, .1, 80, CUTOFF_HZ, fs=SR, output="sos")
    return signal.sosfilt(top_cut, clipped)


dry = scene()
out = record(dry)
dump(out)
```